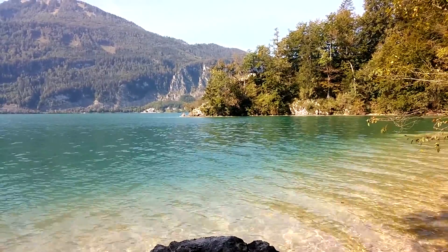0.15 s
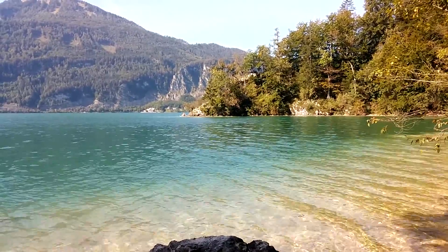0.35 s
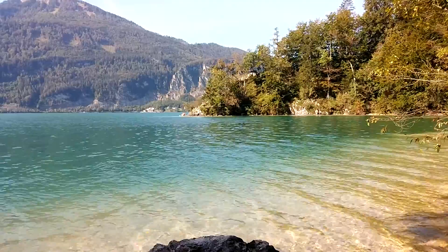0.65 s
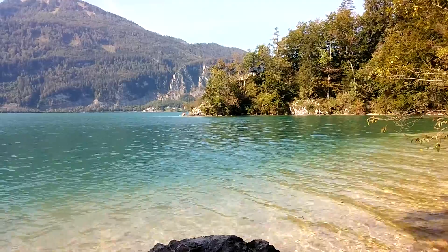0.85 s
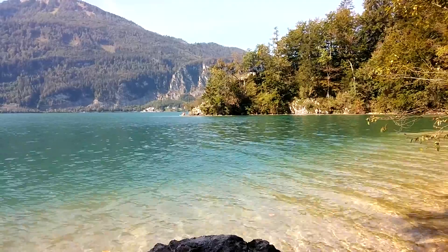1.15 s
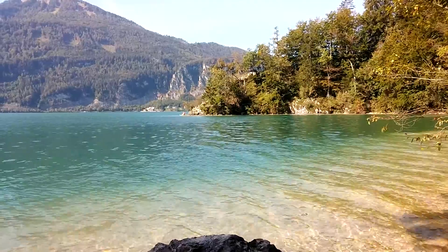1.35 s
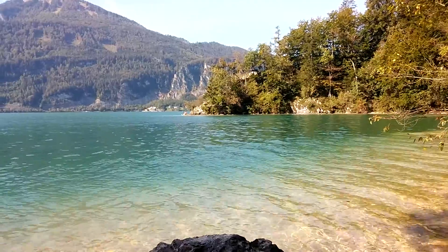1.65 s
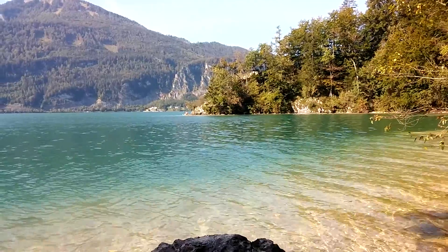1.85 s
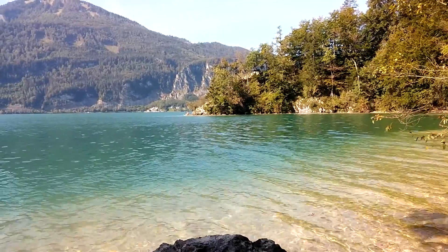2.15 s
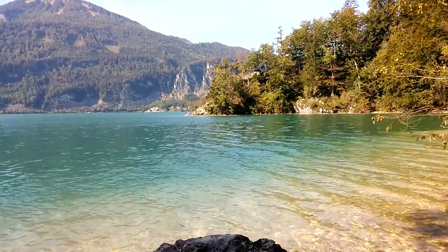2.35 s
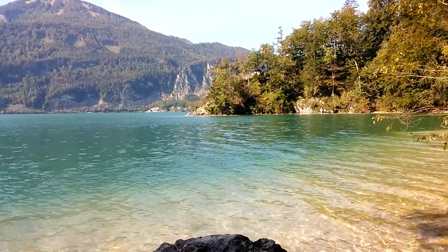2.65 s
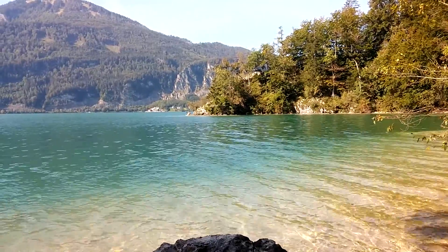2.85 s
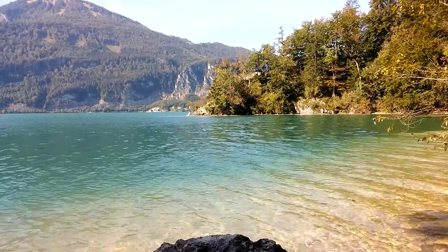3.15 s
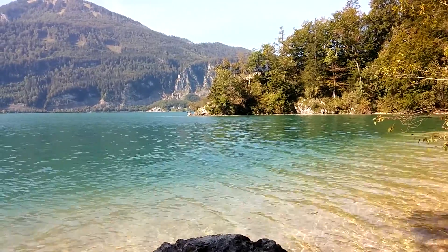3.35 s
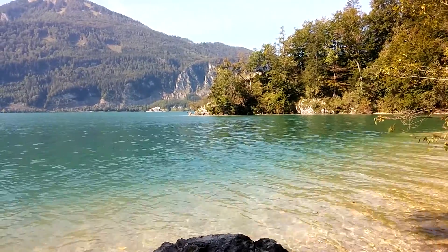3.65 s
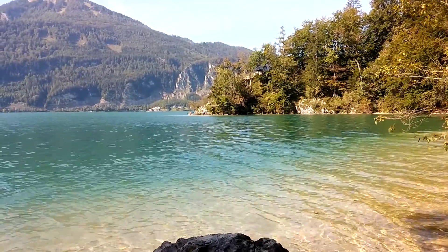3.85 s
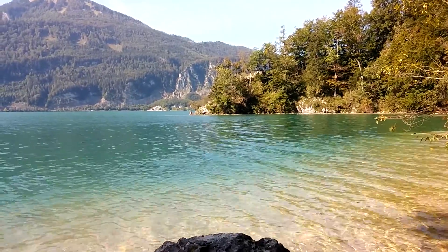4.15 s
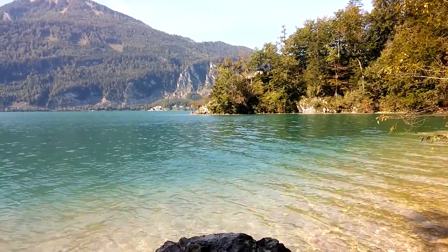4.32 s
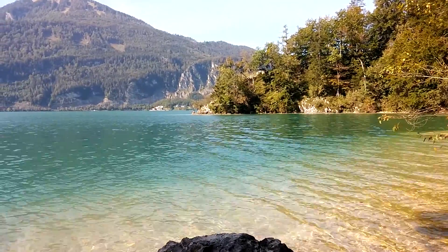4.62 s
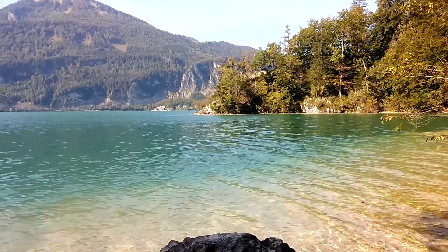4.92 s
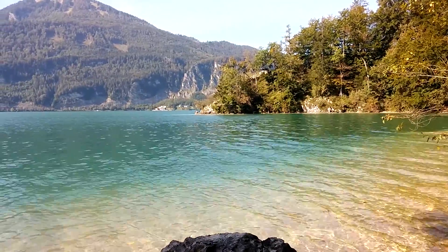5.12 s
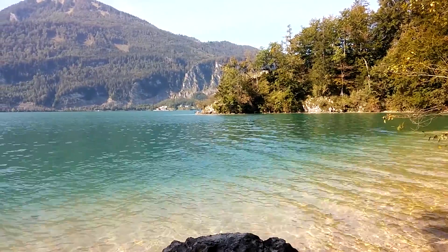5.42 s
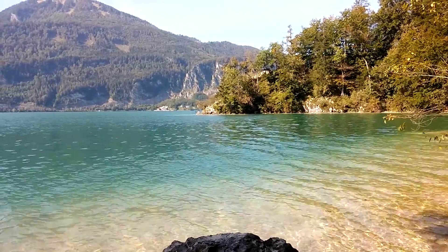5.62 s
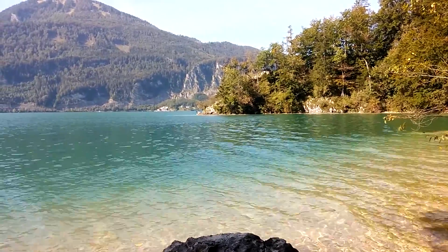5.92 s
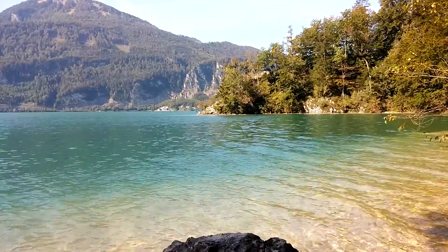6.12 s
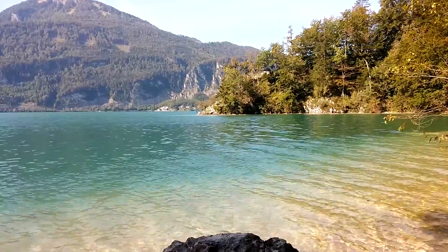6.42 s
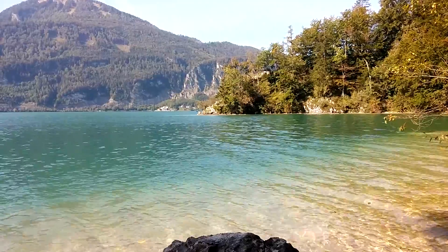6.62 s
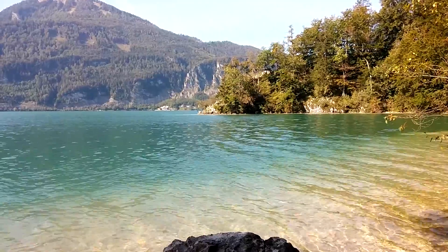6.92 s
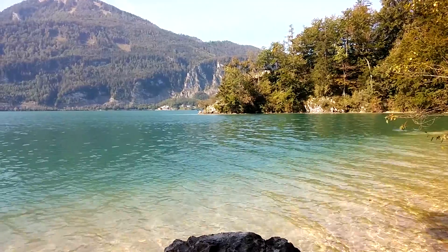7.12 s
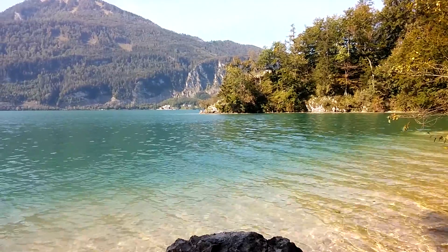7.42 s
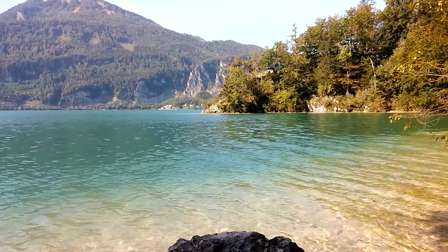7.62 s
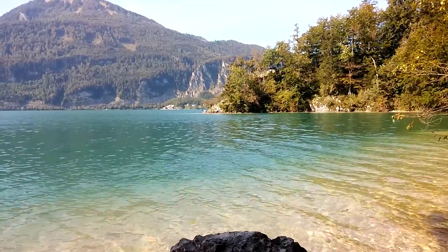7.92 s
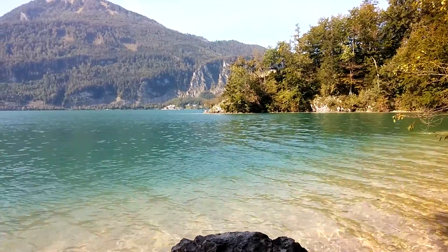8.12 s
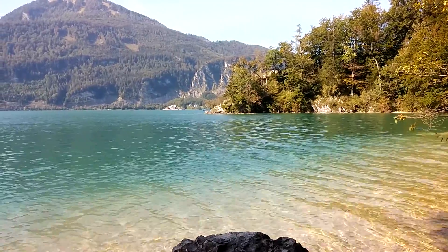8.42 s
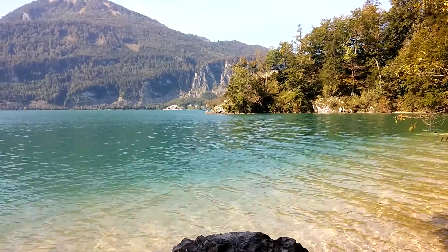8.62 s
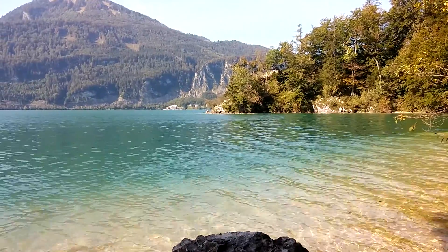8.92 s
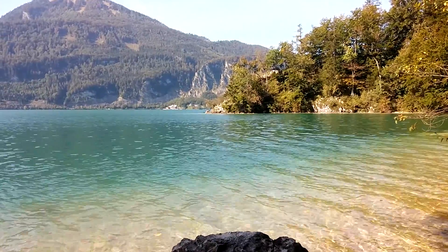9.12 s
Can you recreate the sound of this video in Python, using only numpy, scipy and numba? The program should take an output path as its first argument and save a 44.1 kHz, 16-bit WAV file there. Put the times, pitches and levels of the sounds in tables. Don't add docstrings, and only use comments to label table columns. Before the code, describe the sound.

Close lapping water on lake stones, dry and open, with bright details leaning left. A faint lick over a low, throbbing distant rumble opens it; small drops and fizzes follow at 0.2, 0.5, 0.7 and 0.8 s. A fuller slap with gulping bubbles comes at 1.3 s and trails off by 1.7. Wet plops and chirps return at 2.2 and 2.5, then a near-quiet lull with faint hiss until a crisp splash at 3.55 and a pop at 4.0. Another sharp slap lands at 4.9; gurgles and hollow plops gather from 5.3 to 6.2. Soft ripples lead to clicking splashes at 7.4, then the strongest burst at 7.9 to 8.3, full of snaps, plops and foam. Smaller drops follow at 8.6 and 8.9, ending on a rounded plop at 9.2. Throughout, the background rumble, bank ripples and hiss duck and jump abruptly, staying more open after 6.5 s.

```python
import sys
import numpy as np
from scipy import signal
from scipy.fft import rfft, irfft, next_fast_len
from scipy.io import wavfile
from scipy.ndimage import uniform_filter1d
from numba import njit

SR = 44100
rng = np.random.default_rng(int(sys.argv[2]) if len(sys.argv) > 2 else 0)


def unload_wav(signal):
    wavfile.write(
        sys.argv[1],
        SR,
        np.round(np.clip(np.atleast_2d(signal).T, -1, 1) * 32767).astype(np.int16),
    )


def amplitude_ratio(level_db):
    exponent = np.asarray(level_db, float) / 20
    return 10 ** exponent


N = 408807
LAG = 14


def level(x, db):
    return x * amplitude_ratio(db) / np.sqrt(np.mean(x ** 2))


def colour(x, gain):
    size = next_fast_len(N)
    hz = np.arange(size // 2 + 1) * SR / size + 1
    return irfft(rfft(x, size) * gain(hz), size)[:, :N]


def walk(rate):
    hold = int(SR / rate)
    steps = np.repeat(rng.standard_normal(N // hold + 1), hold)
    return 1.48 * uniform_filter1d(uniform_filter1d(steps, hold), hold)[:N]


def noise(points):
    hz, db = np.transpose(points)
    return colour(rng.standard_normal((2, N)), lambda f: amplitude_ratio(np.interp(np.log(f), np.log(hz), db)))


def shadow_db(hz):
    return np.interp(np.log2(hz / 1000), [-.8, 0, 1, 2, 3], [3.5, 7.5, 10.5, 14, 19])


def scatter(x, db, fade_s):
    t = np.arange(SR // 12) / SR
    tail = rng.standard_normal((2, len(t))) * np.exp(-t / fade_s) * (1 - np.exp(-t / 0.0012))
    return x + amplitude_ratio(db) * signal.fftconvolve(x, tail, axes=1)[:, :N]


@njit
def ring(rows, fall, lag):
    out = np.zeros((2, N + 8192))
    for s, gain, hz, length, glide, right in rows:
        rise = length / fall
        start, phase = int((s - rise) * SR), 0.
        for i in range(min(int(6 * rise * SR), 8000)):
            u = i / (rise * SR)
            pitch = hz * 2 ** (glide * (min(u, 2.) - 1) / fall)
            phase += 2 * np.pi * min(pitch, 17000.) / SR
            v = gain * (u * np.exp(1 - u)) ** 2 * np.sin(phase)
            if start + i >= 0:
                out[0, start + i] += v
                out[1, start + i + lag] += v * right
    return out[:, :N]


def swarm(low_hz, high_hz, cycles, glide, scatter_db, tilt, pan, count):
    when, pitch, size, life, side = rng.random((count, 5)).T
    hz = low_hz * (high_hz / low_hz) ** pitch
    gain = amplitude_ratio(-scatter_db * np.log(1 - .99 * size)) * (low_hz / hz) ** tilt
    length = cycles * (0.29 + 1.401 * life ** 2) / hz
    right = amplitude_ratio(-pan * (0.3 + 2.0 * side) * shadow_db(hz))
    rows = [when * N / SR, gain, hz, length, glide * (side - .3), right]
    x = ring(np.array(rows).T.copy(), 1.776, LAG)
    return x / np.std(x[0])


# (time [s], pitch [Hz])
WHINE = [
    (0, 9190),
    (4, 9150),
    (6.5, 9220),
    (9.27, 9350),
]


def whine():
    pitch_hz = np.interp(np.arange(N) / SR, *np.transpose(WHINE))
    tone = amplitude_ratio(-86) * np.sin(2 * np.pi * np.cumsum(pitch_hz) / SR)
    return tone * amplitude_ratio(9) * np.array([[1], [.3]])


# (frequency [Hz], density [dB per Hz])
HISS = [(1000, -12.5), (1800, -1.5), (4000, -4.5), (7000, -8), (11000, -11.5), (16000, -18)]


def hiss():
    port_hz, width_hz, port_db = 8750, 720, 3.5
    air = noise(HISS)
    lift = lambda f: amplitude_ratio(port_db) * np.array([[1], [.1]]) / (1 + (2 * (f - port_hz) / width_hz) ** 2)
    port = colour(air, lift) * amplitude_ratio(3.5 * walk(3))
    balance = amplitude_ratio(np.array([[1.5], [-1.5]]))
    return level((air + port) * balance, -57) + whine()


# (frequency [Hz], density [dB per Hz])
SHORE = [(210, -51), (350, -9.5), (408, -10), (623, -8), (910, -8), (1140, -26.5), (2000, -20.5),
         (2600, -58), (4400, -120)]


def shore():
    left_port = lambda f: np.array([[1.5], [0]]) / (1 + ((f - 970) / 80) ** 2)
    hollow = lambda f: 0.46 / (1 + ((f - 690) / 60) ** 2)
    ringing = colour(noise(SHORE), lambda f: 1 + left_port(f) + hollow(f))
    return level(ringing * amplitude_ratio(1.8 * walk(22)), -47)


# (time [s], swash strength [dB], motor load [dB])
SWASH = [(0, -53, 5), (1.4, -55, -3.5), (2.1, -52, -9), (2.9, -56, -1), (4.4, -49, 0), (5.5, -47.5, 4.5),
         (6.0, -40, 4), (6.4, -60, 4.5), (7.0, -49.5, 5), (8.2, -50.5, 4.5), (8.9, -51.5, 2),
         (9.27, -46.5, -9)]


def curve(column):
    table = np.transpose(SWASH)
    return np.interp(np.arange(N) / SR, table[0], table[column])


# (frequency [Hz], width [Hz], level [dB])
RUMBLE = [
    (59.7, 27, 0),
    (114.6, 22, -1.5),
    (186, 32, -7.5),
    (315.3, 35.4, -7.5),
    (191, 161, -7),
]


def rumble():
    out, throb = 0, walk(18)
    for hz, width_hz, db in RUMBLE:
        mid, side = rng.standard_normal((2, N))
        pair = np.array([mid + 0.31 * side, 0.87 * (np.roll(mid, LAG) - 0.098 * side)])
        order = lambda f: (1 + ((f - hz ** 2 / f) / width_hz) ** 2) ** -.75 / (1 + (38 / f) ** 4)
        band = colour(pair, order)
        load_db = curve(2) * np.clip(np.log2(hz / 110), 0, 1)
        out = out + level(band, db) * amplitude_ratio(1.5 * throb + 2.2 * walk(14) + load_db)
    return level(out, -31.5)


# (opens [s], closes [s], gain [dB])
OPENINGS = [(0, 0.085, -7.5), (0.192, 0.325, -8.5), (0.389, 0.569, -5.5), (0.646, 0.902, -5.5),
            (0.904, 0.97, -12.5), (0.964, 1.536, -5), (1.55, 1.615, -14), (5.04, 5.11, -14.5),
            (1.617, 1.714, -4), (2.078, 2.27, -8), (2.506, 2.705, -5), (3.49, 3.648, -4),
            (3.852, 3.935, -5.5), (3.935, 3.993, -11), (3.989, 4.091, -3.5), (4.089, 4.32, -13.5),
            (4.587, 4.614, -5.5), (4.673, 4.841, -6), (4.874, 4.969, -7.5), (5.205, 5.265, -13.5),
            (5.282, 5.337, -5.5), (5.521, 5.547, -8), (3.724, 3.79, -13), (5.744, 6.229, -6.5),
            (6.229, 6.342, -15), (6.561, 7.132, -3.5), (7.13, 7.257, -8.5), (7.261, 8.46, -4),
            (8.457, 8.507, -8), (8.505, 8.57, -14), (8.569, 8.94, -4.5), (8.948, 9.13, -13.5),
            (9.125, 9.3, -1)]


def suppressor_db():
    shut_db, waver_db = -14.5, 1.2
    held = shut_db + waver_db * walk(13)
    for opens, closes, db in OPENINGS:
        held[int(opens * SR):int(closes * SR)] = db
    return uniform_filter1d(held, int(0.0058 * SR))


def swash():
    beads = swarm(900, 3600, 8.0, .25, 2.4, .5, .9, count=3600)
    trickle = amplitude_ratio(0.38 * curve(1) - 34) * beads
    pockets = swarm(450, 1150, 8.0, .25, 2.8, .15, .9, count=1400)
    gurgle = amplitude_ratio(curve(1) + 2.5) * pockets
    return trickle + gurgle


# (time [s], foam [dB], fine spray over foam [dB], fade [ms])
SLAPS = [(0.217, -42.5, -13, 220), (.246, -46, 6, 23), (0.514, -39, -3.5, 25), (.699, -42, -7, 81),
         (0.831, -37, -6, 26), (1.212, -43.5, -5.5, 83), (1.276, -29.5, -22, 77), (1.349, -34, -3.5, 16.5),
         (1.477, -39.5, -10, 170), (2.194, -40.5, -5.5, 720), (2.231, -44, -4, 24),
         (2.498, -58.5, 10.5, 116), (2.535, -36, -13, 62), (3.512, -38.5, -29, 97), (3.566, -49, 3.5, 80),
         (3.985, -37, -11, 88), (4.902, -31.5, -18, 54), (5.285, -46, -13, 300), (5.758, -36.5, -11.5, 180),
         (5.886, -42, -11, 73), (6.076, -44.5, 5.5, 32), (6.163, -41, -8, 250), (6.954, -45.5, -4.5, 95),
         (7.357, -40, -6.5, 124), (7.743, -43.5, -19, 410), (7.865, -30, -16, 73), (7.95, -34, -7.5, 94),
         (8.133, -37.5, 0, 30), (8.17, -28.5, -10, 123), (9.124, -40, -10.5, 150)]
# (time [s], foam [dB])
RIPPLES = [(.013, -47), (0.429, -46), (0.632, -51), (.971, -48), (1.611, -47), (2.101, -47), (2.334, -50),
           (2.617, -64.5), (2.005, -56), (3.637, -52), (3.731, -55), (3.863, -42), (4.155, -55),
           (4.536, -48), (4.875, -40.5), (5.1, -41), (5.227, -59), (5.44, -70), (5.517, -74), (6.637, -50),
           (5.97, -50.5), (6.77, -51), (7.131, -40.5), (7.541, -53), (7.61, -42), (8.616, -38.5),
           (8.717, -41), (8.899, -41.5)]


def slaps():
    foam, spray = np.zeros((2, N + SR))
    t = np.arange(SR // 2) / SR
    ripples = [row + (-17.5, 68) for row in RIPPLES]
    for s, db, spray_db, fade_ms in SLAPS + ripples:
        fade = np.exp(-1000 * t / fade_ms) + .3 * np.exp(-t / 0.0014)
        shape = (1 - np.exp(-t / 0.0011)) * fade
        at = slice(int(s * SR), int(s * SR) + len(t))
        foam[at] += amplitude_ratio(db - 7.5) * shape
        spray[at] += amplitude_ratio(db - 4.0 + spray_db) * shape
    spurts = amplitude_ratio(1.66 * walk(60) + 2.2 * walk(300))
    froth = swarm(1050, 6000, 7.0, .15, 2.6, -.05, 1.0, count=16000)
    mist = swarm(4800, 14500, 6.0, .1, 3.2, 1.6, 1.2, count=20000)
    return scatter(spurts * (foam[:N] * froth + spray[:N] * mist), -27, .009)


def gliding(table, octaves):
    return [row + (octaves,) for row in table]


# (time of crest [s], peak [dB], pitch [Hz])
TICKS = [(.429, -32.5, 2220), (.655, -38, 1780), (.728, -32, 2940), (1.721, -40.5, 2640),
         (1.795, -52, 6070), (2.213, -37, 5970), (2.333, -41, 2740), (2.337, -36, 1170), (2.357, -47, 3200),
         (2.663, -32, 2100), (2.833, -33, 2010), (3.513, -35, 2400), (3.739, -43, 4230), (3.8, -43, 2370),
         (3.904, -37, 3680), (4.081, -35, 1930), (4.156, -47.5, 7460), (4.393, -40, 2030),
         (5.002, -47, 6070), (5.356, -39, 5820), (5.784, -38, 6140), (5.88, -35, 2460), (5.917, -33, 3580),
         (6.218, -35.5, 2740), (6.959, -35, 2930), (7.079, -33.5, 3900), (7.155, -38, 2190),
         (7.744, -33, 1740), (7.88, -34, 4440), (8.052, -36, 6460), (8.142, -46, 1450), (8.3, -29, 3300),
         (8.52, -47, 5630), (8.622, -39.5, 6320), (9.128, -39.5, 3160)]


def ticks():
    return gliding([row + (2.92,) for row in TICKS], -0.071)


# (time of crest [s], peak [dB], pitch [Hz], length [ms])
POPS = [(.249, -24, 3080, 0.83), (.283, -29.5, 1880, 4.9), (.853, -37, 1550, 9.5), (1.275, -23, 2880, 1.4),
        (1.288, -21.5, 3000, 0.9), (1.32, -24, 2380, 1.04), (1.615, -25.5, 1540, 12.4),
        (2.54, -27, 5250, 4.6), (2.548, -19.5, 1720, 3.3), (2.625, -23.5, 2220, 2.4),
        (3.572, -26, 3970, 2.1), (3.637, -28.5, 8000, 0.75), (3.64, -26, 3570, 2.5),
        (3.989, -28, 2810, 3.1), (3.998, -20.5, 1220, 1.7), (5.76, -24, 2040, 2.8), (6.073, -31, 5900, 1.6),
        (6.186, -31.5, 1770, 9.4), (6.638, -27, 1750, 1.8), (6.784, -33, 2330, 3.9),
        (7.154, -33.5, 8360, 1.1), (7.363, -26, 1990, 3.8), (7.383, -19, 5700, 0.49),
        (7.873, -11.5, 2580, 0.31), (7.894, -20, 2100, 0.93), (8.2, -34, 6060, 1.4),
        (8.284, -27, 1270, 5.8), (8.382, -26, 1450, 4.9), (8.933, -30, 4280, 5)]
# (time of crest [s], peak [dB], pitch [Hz], length [ms])
BLIPS = [(0.034, -38.5, 1680, 3.4), (1.239, -36, 1950, 2.7), (1.276, -31.0, 1890, 2.8),
         (1.354, -35, 1800, 3), (1.54, -39, 1440, 4.6), (2.244, -32, 1800, 3.4), (2.394, -38, 990, 12),
         (3.514, -36, 1040, 3.8), (3.545, -37, 1006, 12), (3.865, -44, 2100, 9.0), (3.903, -38, 1770, 5),
         (4.022, -35, 590, 8.3), (4.904, -34, 1850, 4.2), (5.881, -31, 1980, 2.3),
         (6.084, -35.6, 2150, 1.8), (6.204, -34, 700, 6.4), (7.2, -42, 2000, 4.7), (8.021, -33, 2090, 8.5),
         (8.144, -30, 1450, 3.4), (8.173, -17.5, 2080, 2.4), (8.184, -32, 2260, 4.2),
         (8.922, -37.5, 2000, 3.0)]
# (time of crest [s], peak [dB], pitch [Hz], length [ms])
PLIPS = [(0.248, -28, 8600, 0.7), (0.518, -37, 2400, 3.0), (0.518, -35, 7740, 0.7),
         (0.835, -37, 5700, 0.48), (0.835, -27, 6660, 0.64), (1.043, -43.6, 2650, 7),
         (1.29, -35, 5600, 1.9), (1.355, -32, 6240, 0.7), (1.517, -41, 3450, 6.0), (1.68, -39.5, 2550, 8.2),
         (2.213, -38, 3030, 3.1), (3.52, -39, 3120, 4.5), (3.542, -38, 2410, 2.0), (3.568, -29, 9600, 0.47),
         (3.568, -20, 6680, 0.52), (3.568, -26, 7280, 0.51), (3.569, -23, 3400, 1.5),
         (3.57, -24, 4440, 2.3), (3.637, -30, 7020, 0.53), (4.024, -40, 5940, 1.4), (4.053, -30, 3700, 2.5),
         (4.9, -33, 3020, 1.8), (4.929, -35, 2800, 2.1), (4.937, -34, 4000, 4.1), (5.803, -40, 5900, 1.6),
         (5.89, -38, 4700, 3.6), (6.085, -35, 5600, 0.87), (6.091, -28, 4480, 1.2),
         (6.162, -31, 5400, 0.78), (6.974, -28, 7660, 0.47), (7.154, -30, 7300, 0.61),
         (7.367, -37, 3500, 3.2), (7.37, -39, 5600, 1.8), (7.379, -29.5, 2940, 2.0),
         (7.384, -23.5, 7450, 0.66), (7.386, -25, 4130, 1.17), (7.386, -24, 3750, 1.13),
         (8.048, -30, 3200, 2.2), (8.145, -18, 4600, 0.9), (8.172, -28, 6070, 0.78),
         (8.172, -17, 3550, 1.25), (8.174, -21, 4010, 0.95), (8.183, -31, 7410, 0.9),
         (8.22, -23, 5810, 1.1), (8.933, -38.9, 5400, 1.4), (9.144, -30, 7800, 0.5),
         (9.144, -33.5, 9600, 1.5)]
# (time of crest [s], peak [dB], pitch [Hz], length [ms])
BEADS = [(.442, -40, 3450, 2.1), (0.563, -37, 1010, 8), (.825, -36.5, 497, 14), (.99, -44, 4350, 3),
         (1.132, -50, 2720, 7.3), (1.208, -45, 4220, 3.9), (1.889, -51, 2410, 5.3), (2.009, -45, 3000, 3),
         (2.032, -44.5, 3450, 2.2), (2.043, -48, 5430, 1.9), (2.152, -42, 1450, 4), (2.156, -47, 3270, 3.1),
         (2.197, -39, 3600, 3.4), (2.474, -45, 7100, 2), (2.548, -38, 2830, 3.5), (2.617, -32, 7800, 0.76),
         (2.95, -54, 2270, 6), (3.337, -43, 1330, 5), (3.791, -43, 4690, 1.8), (3.816, -46, 2400, 3),
         (3.878, -45, 3190, 2.7), (3.883, -43, 5900, 1.1), (3.92, -42, 970, 17), (4.111, -40, 1770, 5),
         (4.345, -51, 6500, 1.8), (4.659, -39.5, 1380, 5.8), (5.105, -39, 786, 7.2),
         (5.12, -45.5, 2290, 4.4), (5.228, -39, 7900, 0.67), (5.596, -45, 1550, 4.1),
         (5.815, -36, 1500, 9.5), (6.0, -44, 5900, 1.9), (6.199, -34, 3270, 1.6), (6.3, -47, 6980, .9),
         (6.593, -44, 1490, 5), (6.86, -37.5, 620, 10), (7.035, -37.5, 4560, 2), (7.048, -41.5, 1140, 10.6),
         (7.227, -44, 3450, 3.4), (7.315, -45, 2900, 3), (8.002, -32, 2720, 3), (8.144, -30, 7540, .7),
         (8.623, -38, 4390, 1.6), (9.13, -36, 3920, 1.2)]


def pops():
    return gliding(POPS + BLIPS + PLIPS + BEADS, -0.071)


# (time of crest [s], peak [dB], pitch [Hz], length [ms])
RISERS = [(.636, -32.5, 1190, 3.1), (.834, -36.5, 3180, 4.3), (1.292, -22, 560, 14), (1.305, -21.5, 760, 4),
          (1.355, -24.5, 2370, 1.76), (1.356, -22.5, 3700, 2.16), (1.367, -28, 2100, 2.7),
          (2.167, -36, 1060, 7.6), (2.213, -28, 1500, 2.2), (2.234, -21, 2510, 1.5),
          (2.547, -34.5, 3550, 6), (3.516, -29.5, 1370, 9.9), (3.569, -19.5, 2940, 0.2),
          (4.052, -32, 3440, 2.1), (4.539, -36.5, 1360, 4.5), (4.903, -16, 3830, 0.66),
          (4.914, -30, 1550, 17), (4.924, -30.5, 820, 5.8), (5.235, -34.5, 807, 10.4),
          (5.89, -36, 3600, 4.8), (5.897, -33.5, 3100, 2.56), (6.008, -32, 620, 6.8),
          (6.086, -23, 3240, 2.7), (6.154, -32, 702, 13), (7.981, -21.5, 3720, 3.5),
          (8.143, -31, 5460, 5.6), (8.174, -17, 2680, 4.8), (8.238, -29, 5200, 1.1),
          (8.413, -31.5, 930, 9.7), (9.157, -35.5, 1520, 17)]


def risers():
    return gliding(RISERS, 0.38)


# (time of crest [s], peak [dB], pitch [Hz], length [ms])
DROPS = [(.248, -22, 5840, 1.2), (.256, -29, 4930, 2.8), (.441, -34, 2300, 5.5), (.518, -22, 6350, 0.71),
         (.701, -17, 4400, 2.3), (.835, -26.5, 7040, 1.4), (.837, -20.5, 1680, 4.5),
         (1.352, -28.5, 8800, 1.5), (1.522, -31, 4730, 6.2), (2.619, -28, 5600, 4.4),
         (3.543, -33, 1455, 9.7), (3.557, -35, 3700, 4.8), (3.568, -30, 8170, 2.6),
         (3.569, -16, 5140, 0.56), (4.922, -31, 3970, 6.4), (5.319, -26, 1420, 7.9),
         (5.896, -31, 1850, 3.8), (6.179, -29, 4540, 1.4), (7.543, -29.5, 2070, 5.2),
         (7.869, -18.5, 5080, 1.83), (8.145, -16.5, 3400, 1.8), (8.171, -19, 4870, 0.49),
         (8.177, -21.5, 5140, 4.9), (8.181, -26.5, 1660, 6.4), (8.206, -26.5, 2960, 6.4),
         (8.219, -17, 4500, 1.8), (8.621, -27, 2200, 3.6), (8.922, -28.5, 4470, 2.3)]


def falling_drops():
    return gliding(DROPS, -0.42)


# (time of crest [s], peak [dB], pitch [Hz], length [ms])
PLOPS = [(.482, -33, 780, 7.7), (.919, -34, 816, 9.3), (.989, -35.5, 1100, 5.5), (1.288, -23, 1020, 1.4),
         (1.664, -39, 690, 15), (2.203, -28.5, 794, 9.3), (2.508, -37, 860, 7.2), (2.51, -32, 434, 16.7),
         (2.547, -28, 1020, 1.3), (2.79, -43, 510, 19), (3.109, -41, 670, 20), (4.003, -31.5, 596, 8),
         (4.005, -28, 1120, 5.4), (5.312, -32.5, 575, 7.5), (5.761, -30, 602, 11), (5.796, -25, 610, 5),
         (5.821, -34, 856, 10.5), (5.918, -27.5, 937, 12.4), (6.83, -33.5, 863, 8.8),
         (7.354, -28.5, 584, 12), (7.873, -26.5, 680, 7.5), (7.921, -29, 760, 7.3), (7.953, -15, 726, 3.7),
         (8.187, -23.5, 1010, 3), (8.241, -35.5, 1140, 9.8), (8.253, -29, 935, 5.6),
         (8.314, -27, 330.5, 19.8), (8.644, -35.5, 567, 33), (9.21, -22.5, 896, 9.7),
         (9.264, -36, 600, 9.3)]


def plops():
    return gliding(PLOPS, -0.17)


def bubbles():
    notes = plops() + falling_drops() + risers() + pops() + ticks()
    s, db, hz, ms, glide = np.transpose(notes)
    length = np.minimum(ms / 1000, 22 / hz)
    right = amplitude_ratio(-shadow_db(hz) * rng.uniform(.55, 1.3, len(s)))
    x = ring(np.array([s, amplitude_ratio(db), hz, length, glide, right]).T.copy(), 1.8, LAG)
    x = x * amplitude_ratio(2.2 * walk(700))
    return scatter(x, -29.5, .0105)


def scene():
    gate_db = suppressor_db()
    foam = amplitude_ratio(4.3 * np.minimum(gate_db + 13.0, 0)) * slaps()
    background = amplitude_ratio(gate_db) * rumble() + amplitude_ratio(0.9 * gate_db) * shore() + amplitude_ratio(0.78 * gate_db) * hiss()
    return bubbles() + foam + amplitude_ratio(0.79 * gate_db) * swash() + background


def top_cut(x):
    return signal.sosfilt(signal.butter(12, 15620, fs=SR, output="sos"), x)


def record(dry):
    mix = colour(dry, lambda f: f < 15620) - .0015
    return top_cut(mix)


dry = scene()
out = record(dry)
unload_wav(out)
```